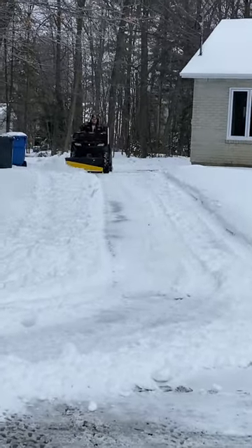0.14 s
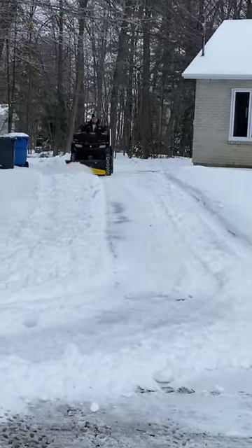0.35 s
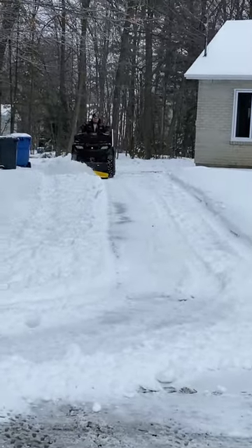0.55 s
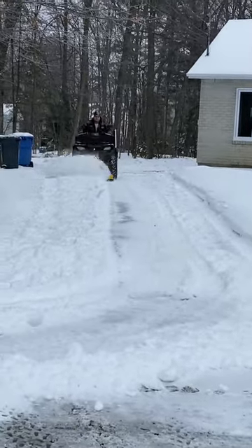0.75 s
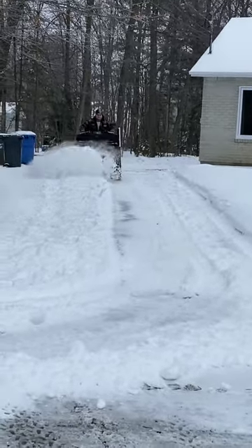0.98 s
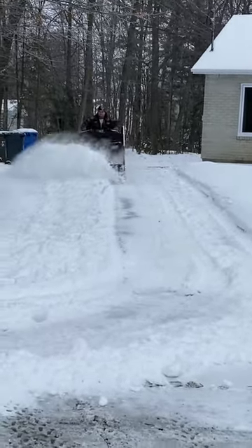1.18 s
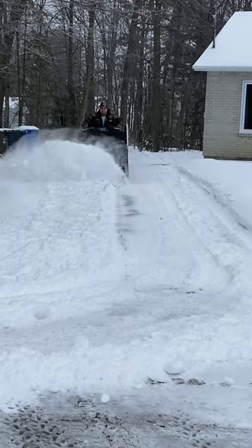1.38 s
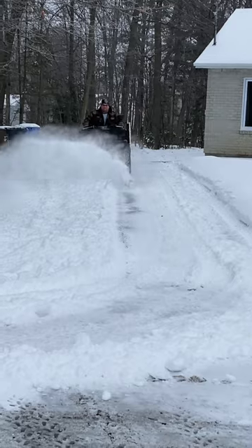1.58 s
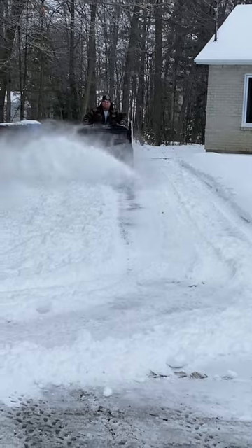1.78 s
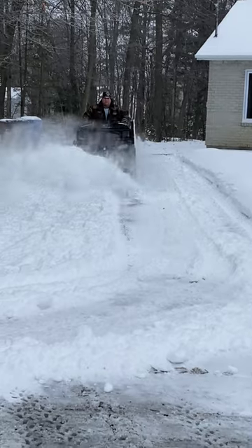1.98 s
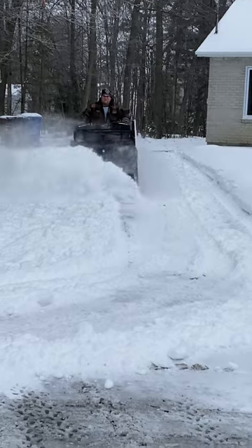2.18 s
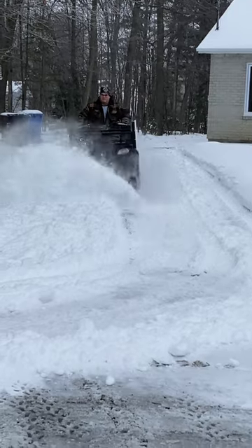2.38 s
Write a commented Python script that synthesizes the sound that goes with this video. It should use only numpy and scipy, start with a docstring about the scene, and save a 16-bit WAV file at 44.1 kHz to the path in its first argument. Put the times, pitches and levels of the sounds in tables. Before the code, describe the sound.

Rough low engine rumble of a quad ploughing snow, with blade scrape, knocks and icy ticks

```python
"""Four-wheeler ploughing snow.

A small four-wheeler with a plough blade drives towards the listener along a snowy drive.
Its exhaust throbs as uneven multiples of the cycle rate, over noise rumble and pulsing clatter.
The drive whines as a wavering sine. Random grains make the blade's scrape and hissing spray.
Noise bursts knock on frozen ground, ring the steel and tick.
Two close microphone ports hear it all from the front."""
import sys
import numpy as np
from scipy import signal
from scipy.fft import rfft, irfft
from scipy.io import wavfile
from scipy.ndimage import uniform_filter1d

SR = 44100
rng = np.random.default_rng(int(sys.argv[2]) if len(sys.argv) > 2 else 0)


def materialize(psi):
    """Save the field psi as 16-bit PCM at rate SR to the path in sys.argv[1].

    A 1-D psi becomes a single channel; in a 2-D psi each row is a channel.
    """
    bounded = np.clip(np.atleast_2d(psi).T, -1, 1)
    quanta = np.round(bounded * 32767).astype(np.int16)
    wavfile.write(sys.argv[1], SR, quanta)


def decibels_to_gain(level_db):
    """Convert a level in decibels to a linear amplitude gain (20 dB per decade)."""
    exponent = np.asarray(level_db, float) / 20
    return 10 ** exponent


N = 112014


def noise():
    """White noise of rms 1."""
    return rng.standard_normal(N)


def curves(rows):
    """Columns of a timed table, interpolated linearly to every sample."""
    time_s, *columns = np.transpose(rows)
    return [np.interp(np.arange(N) / SR, time_s, column) for column in columns]


def rms_one(x):
    """Scale to rms 1."""
    return x / np.sqrt(np.mean(x ** 2) + 1e-20)


def bin_gains(spectrum):
    """Gain of each FFT bin, interpolated over log frequency."""
    hz, db = np.transpose(spectrum)
    bin_hz = np.fft.rfftfreq(N, 1 / SR)
    return decibels_to_gain(np.interp(np.log(bin_hz + 1), np.log(hz), db))


def colour(x, spectrum):
    """Filter by a spectrum; rms 1."""
    return rms_one(irfft(rfft(x) * bin_gains(spectrum), N))


def drift(corner_hz):
    """Slow random curve of rms 1: noise at SR / 40 through two equal lowpass poles."""
    pole = np.exp(-2 * np.pi * corner_hz * 40 / SR)
    slow = signal.lfilter([1], [1, -2 * pole, pole ** 2], rng.standard_normal(N // 40 + 2002))
    slow = rms_one(slow[2000:])  # without the start-up
    return np.interp(np.arange(N) / 40, np.arange(len(slow)), slow)


RISE_S, FALL_S = 0.0012, 0.008


def bursts(rows, fall_s):
    """Summed envelopes: linear rise, hold, exponential fall."""
    t, envelope = np.arange(N) / SR, np.zeros(N)
    for start_s, db, length_s in rows:
        rise = np.clip((t - start_s) / RISE_S, 0, 1)
        fall = np.exp(-np.clip(t - start_s - length_s, 0, 1) / fall_s)
        envelope += decibels_to_gain(db) * rise * fall
    return envelope


# Drive whine: (time [s], frequency [Hz], level [dB])
WHINE = [(0, 1589, -59), (.3, 1585, -56), (.4, 1620, -48.5), (.52, 1649, -53.5), (.75, 1658, -58),
         (1.05, 1682, -46), (1.25, 1656, -48), (1.5, 1668, -46), (1.65, 1718, -49), (1.9, 1740, -50),
         (2.1, 1747, -54), (2.54, 1732, -52)]
WHINE_DRIFT_HZ, WHINE_DRIFT_DB, WHINE_DRIFT_RAD = 12, 2.0, .7


def whine():
    """Gear tone: a sine of gliding pitch, wavering in level and phase."""
    hz, db = curves(WHINE)
    phase = 2 * np.pi * np.cumsum(hz) / SR + WHINE_DRIFT_RAD * drift(WHINE_DRIFT_HZ)
    level = decibels_to_gain(db + WHINE_DRIFT_DB * drift(WHINE_DRIFT_HZ))
    return level * np.sqrt(2) * np.sin(phase)


# Squeaks: (time [s], level [dB], hold [s])
SQUEAKS = [(2.0, -41, .02), (2.475, -45, .02)]
# Squeak spectrum: (frequency [Hz], level [dB])
SQUEAK_SPECTRUM = [(2200, -40), (2440, -3), (2500, 0), (2560, -3), (2800, -40)]


def squeaks():
    """Two brief bursts of narrow-band noise."""
    return bursts(SQUEAKS, FALL_S) * colour(noise(), SQUEAK_SPECTRUM)


# Bright ticks of ice: (time [s], level [dB], hold [s])
TICKS = [(.59, -52, 0.0031), (.866, -41.5, .01), (1.085, -36.5, 0.0047), (1.3, -49, .006),
         (1.455, -37, 0.0045), (1.69, -47, .005), (1.862, -30, 0.0048), (2.04, -33, 0.0094),
         (2.186, -30, 0.0063), (2.203, -30.5, 0.011)]
# Tick spectrum: (frequency [Hz], level [dB])
TICK_SPECTRUM = [(800, -32), (2000, 5), (4500, -1), (8000, 3), (12000, -8), (16000, -22)]
TICK_FALL_S = .003


def ticks():
    """Ice ticks: short bursts of bright noise."""
    return bursts(TICKS, TICK_FALL_S) * colour(noise(), TICK_SPECTRUM)


# Knocks on frozen ground: (time [s], crunch level [dB], hold [s], steel drive re crunch [dB])
KNOCKS = [(0.591, -34, 0.017, -6.5), (0.618, -40, .02, -15), (0.646, -33, 0.018, -7),
          (.67, -41.5, 0.029, -10), (1.115, -36, 0.051, -10), (1.19, -36.5, 0.045, -12),
          (1.285, -34.5, 0.021, -25), (1.362, -37.5, 0.028, -20), (1.799, -37, 0.059, -9.5),
          (2.249, -27, 0.0078, -6.5), (2.258, -25, 0.013, -9), (2.323, -31, 0.013, -5),
          (2.376, -33, 0.014, 3.5), (2.403, -32.5, 0.012, -8)]
# Crunch spectrum: (frequency [Hz], level [dB])
CRUNCH_SPECTRUM = [(120, -44), (260, 1.5), (420, 1), (600, -5), (950, -3.5), (1700, -3), (2200, -12),
                   (5000, -13.5), (9000, -24), (16000, -31)]
# Steel blade modes: (frequency [Hz], level [dB], decay by 60 dB [s])
STEEL_MODES = [(155, -2, .1), (268, -4, .08), (408, -1, .25), (760, -10, .05), (920, -10, .04),
               (975, -8, .08), (1190, -11, .04), (1580, -11, .03), (1760, -9, .04)]


def knocks():
    """Crunches of noise; noise of the same timing also drives the blade's resonances."""
    crunch = bursts([(s, db, length) for s, db, length, _ in KNOCKS], FALL_S)
    force = bursts([(s, db + ring_db, length) for s, db, length, ring_db in KNOCKS], FALL_S)
    out = crunch * colour(noise(), CRUNCH_SPECTRUM)
    for hz, db, t60_s in STEEL_MODES:
        radius, angle = decibels_to_gain(-60 / (t60_s * SR)), 2 * np.pi * hz / SR
        push = force * noise() + 1e-18
        feed = [0, 2 * np.sin(angle) * np.sqrt(1 - radius)]
        out += decibels_to_gain(db) * signal.lfilter(feed, [1, -2 * radius * np.cos(angle), radius ** 2], push)
    return out


# Blade in snow, before the offsets: (time [s], scrape level [dB], spray level [dB])
BLADE = [(0.0, -46.5, -67), (0.22, -50.5, -61), (0.69, -42.5, -55.5), (0.82, -43, -54), (0.93, -42.5, -47),
         (1.15, -38, -42), (1.29, -38.5, -44), (1.57, -40, -43.5), (2.01, -39, -37.5), (2.16, -39.5, -40.5),
         (2.39, -39.5, -44), (2.54, -38, -41.5)]
# Scrape spectrum: (frequency [Hz], level [dB])
SCRAPE_SPECTRUM = [(200, -46), (350, -1), (600, -3), (950, -1.5), (1250, -6.5), (1700, -3), (2100, -6.5),
                   (2600, -3), (4000, -25.5), (8000, -44)]
# Spray spectrum: (frequency [Hz], level [dB])
SPRAY_SPECTRUM = [(1200, -14), (2500, -1.5), (4200, 1), (6200, -5), (8000, -5), (10000, -9), (13000, -15),
                  (16000, -13.5)]
SCRAPE_OFFSET_DB, SPRAY_OFFSET_DB = -0.5, 1
GRAINS_PER_S, GRAIN_SPREAD_DB = 6000, 1.5
LUMPS_PER_S, LUMP_MEAN_DB, LUMP_FALL_S, LUMP_MAX_DB = 30, 2.0, .006, 9.0


def snow_grains():
    """Impulses at random times, of random sign and strength."""
    born = rng.random(N) < GRAINS_PER_S / SR
    spread_db = GRAIN_SPREAD_DB * np.minimum(rng.exponential(1, N), 5)
    return born * decibels_to_gain(spread_db) * noise()


def snow_lumps_db():
    """Breaking lumps: level jumps at random times, decaying exponentially."""
    lumps = (rng.random(N) < LUMPS_PER_S / SR) * rng.exponential(1, N)
    decay = np.exp(-1 / (LUMP_FALL_S * SR))
    return np.minimum(LUMP_MEAN_DB * signal.lfilter([1], [1, -decay], lumps), LUMP_MAX_DB)


def blade():
    """Dense snow grains: a dull scrape and a bright spray, flickering partly together."""
    scrape_db, spray_db = curves(BLADE)
    shared_db = .8 * drift(10.0) + .8 * drift(25.0) + snow_lumps_db()
    scrape_db = scrape_db + SCRAPE_OFFSET_DB + shared_db + 0.57 * drift(26.0)
    spray_db = spray_db + SPRAY_OFFSET_DB + 0.79 * shared_db + 0.27 * drift(13.0)
    scrape = decibels_to_gain(scrape_db) * colour(snow_grains(), SCRAPE_SPECTRUM)
    spray = decibels_to_gain(spray_db) * colour(snow_grains(), SPRAY_SPECTRUM)
    return scrape + spray


# Rumble spectrum: (frequency [Hz], level [dB])
RUMBLE_SPECTRUM = [(25, -28), (50, -3), (80, -8), (130, -2.5), (220, -3), (320, -12.5), (500, -30),
                   (900, -41)]
RUMBLE_RE_EXHAUST_DB = -8.5  # at full load


def rumble(load):
    """Low noise whose power follows the load."""
    return decibels_to_gain(RUMBLE_RE_EXHAUST_DB) * np.sqrt(load) * colour(noise(), RUMBLE_SPECTRUM)


# Clatter spectrum: (frequency [Hz], level [dB])
CLATTER_SPECTRUM = [(250, -37), (400, -3.5), (800, -1.5), (1150, -4), (1600, 2), (2100, -8.5), (3500, -9.5),
                    (7000, -28), (16000, -48)]
CLATTER_START_RE_EXHAUST_DB, CLATTER_DB_PER_S, CLATTER_PULSE_DEPTH = -13.5, -1.13, 0.18


def clatter(cycle_phase):
    """Noise pulsing once per cycle, sinking steadily against the exhaust."""
    pulse = 1 + CLATTER_PULSE_DEPTH * np.cos(cycle_phase)
    db = CLATTER_START_RE_EXHAUST_DB + CLATTER_DB_PER_S * np.arange(N) / SR
    return decibels_to_gain(db) * colour(pulse * noise(), CLATTER_SPECTRUM)


# Exhaust multiples: (multiple of cycle rate [1], start level re exhaust [dB], growth [dB/s])
EXHAUST = [(1, -25, -3.5), (3, -1.5, -2.5), (4, 0, 0), (5, -3.5, -2.56), (6, -15.5, 0.23), (7, -11, -2),
           (8, -23, 0.5), (9, -23, 0.2), (10, -34.5, 3), (11, -37, -3), (12, -40.5, 3)]
FIRING_GAP_DEG = 200  # between the two cylinders, in a cycle of 360; sets each multiple's sign
ODD_SHIFT_RAD = .55  # per multiple, odd ones only, counted from the 4th
WAVER_DB, WAVER_RAD, WAVER_HZ = 2.5, .3, 6.0  # before the looseness factor


def exhaust(cycle_phase, exhaust_db, second_db, load):
    """Unevenly firing cylinders: cosines at multiples of the cycle rate, loosened by load."""
    t, out = np.arange(N) / SR, 0
    multiples = [(k, exhaust_db + db + growth * t) for k, db, growth in EXHAUST]
    for k, level_db in [(2, second_db)] + multiples:
        loose = .3 if k in (2, 4) else load * np.sqrt(k / 4)
        sign = np.sign(np.cos(np.radians(k * FIRING_GAP_DEG / 2)))
        level = decibels_to_gain(level_db + loose * WAVER_DB * drift(WAVER_HZ))
        shift = ODD_SHIFT_RAD * (k - 4) * (k % 2) + loose * WAVER_RAD * drift(WAVER_HZ)
        out += sign * np.sqrt(2) * level * np.cos(k * cycle_phase + shift)
    return out


# Engine: (time [s], cycle rate [Hz], exhaust level [dB], level of the 2nd multiple [dB])
ENGINE = [(0.0, 34.99, -32.5, -37), (0.39, 34.37, -29.5, -32), (0.52, 34.4, -29, -41),
          (0.62, 33.92, -30.5, -45), (0.71, 33.13, -31.5, -35), (0.9, 32.74, -28.5, -34),
          (1.07, 32.37, -27, -30.5), (1.2, 31.89, -28.5, -34), (1.39, 31.67, -26, -39),
          (1.5, 31.26, -28, -30), (1.65, 31.55, -23.5, -35), (1.83, 31.29, -26.5, -27.5),
          (1.92, 31.14, -25, -33), (2.0, 31.0, -24, -44), (2.03, 31.03, -22.5, -35),
          (2.11, 31.29, -26.5, -44), (2.28, 30.71, -21, -28.5), (2.48, 30.47, -24, -29),
          (2.51, 30.84, -21.5, -30), (2.54, 30.9, -22.5, -38)]
# Snow load on the blade, roughening the engine: (time [s], share [0-1])
LOAD = [(0, .3), (.55, .35), (.7, .8), (1.2, 1.0), (2.54, 1.0)]


def engine():
    """Exhaust over rumble and clatter, which follow its smoothed level."""
    rate_hz, exhaust_db, second_db = curves(ENGINE)
    load, = curves(LOAD)
    cycle_phase = 2 * np.pi * np.cumsum(rate_hz) / SR
    smooth_level = decibels_to_gain(uniform_filter1d(exhaust_db, size=SR // 4))
    body = rumble(load) + clatter(cycle_phase)
    return exhaust(cycle_phase, exhaust_db, second_db, load) + smooth_level * body


def scene():
    """All sources straight ahead, alike in both channels."""
    return np.tile(whine() + squeaks() + ticks() + knocks() + blade() + engine(), (2, 1))


# Right port's phase lead over the left: (frequency [Hz], lead [rad])
PORTS = [(0, 0), (860, .45), (1500, 0), (2580, -.4), (3100, 0), (3800, -.03), (4350, -.55), (5000, -.2),
         (5700, -1.1), (6400, -2.2), (7300, -3.14), (8100, -3.5), (8800, -4.6), (9500, -5.4),
         (10200, -6.25), (11400, -6.35), (12000, -7.9), (12900, -9.0), (13600, -9.42), (14300, -9.7),
         (15000, -10.8), (15700, -12.1), (22050, -12.6)]
# Scatter, unlike in the two ports: (frequency [Hz], level [dB])
SCATTER_SPECTRUM = [(100, -81), (500, -11), (1200, -3), (1600, -32.5), (2500, -9), (3100, -28), (3800, -43),
                    (4500, -8), (6000, -15), (7300, -22.5), (9000, -13), (10200, -21), (11300, -34),
                    (12300, -1), (13600, -18), (15200, -14.5)]
SCATTER_FALL_S, CUTOFF_HZ = .015, 15750


def port_phases():
    """Phase lead split evenly between the ports."""
    hz, rad = np.transpose(PORTS)
    lead_rad = np.interp(np.fft.rfftfreq(N, 1 / SR), hz, rad)
    return np.exp(.5j * lead_rad * np.array([[-1], [1]]))


def port_scatter():
    """Reflections: a separate decaying noise response of unit energy per port, then coloured."""
    decay = np.exp(-np.arange(8000) / (SCATTER_FALL_S * SR))
    response = rng.standard_normal((2, 8000)) * decay
    response = response / np.sqrt(np.sum(response ** 2, axis=1, keepdims=True))
    return bin_gains(SCATTER_SPECTRUM) * rfft(response, N)


def low_pass(x):
    """Removes everything above the highest recorded frequency."""
    return signal.sosfilt(signal.butter(12, 17090, fs=SR, output="sos"), x)


def record(dry):
    """Two ports, differing in phase and scatter; sharp cut of the top."""
    passband = np.fft.rfftfreq(N, 1 / SR) < CUTOFF_HZ
    mix = irfft(rfft(dry) * (port_phases() + port_scatter()) * passband, N)
    return low_pass(mix)


dry = scene()
out = record(dry)
materialize(out)
```